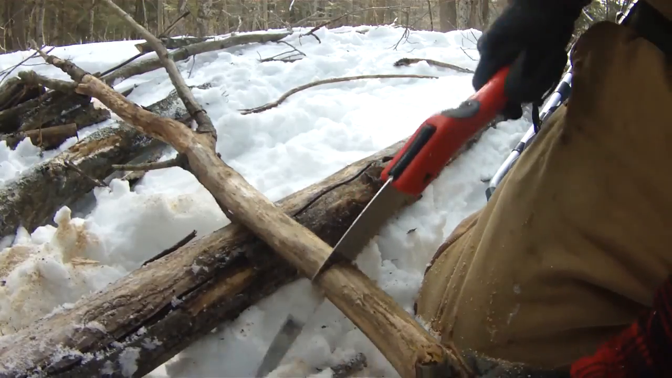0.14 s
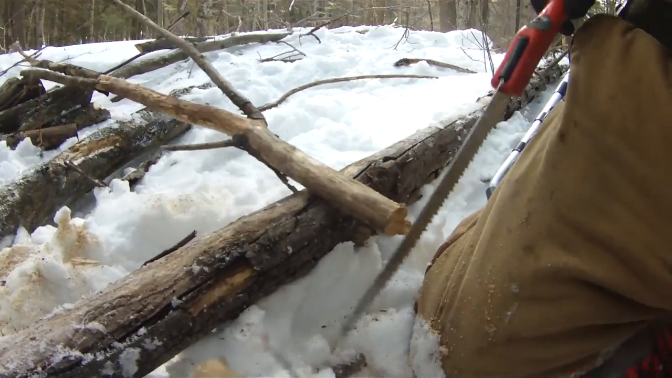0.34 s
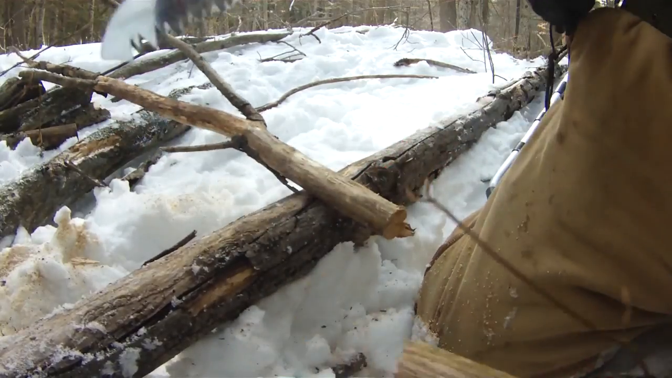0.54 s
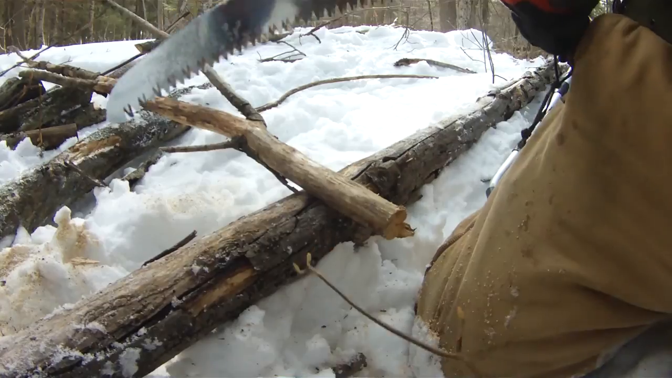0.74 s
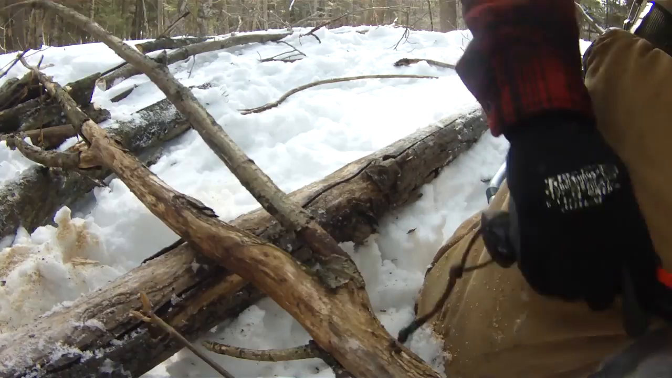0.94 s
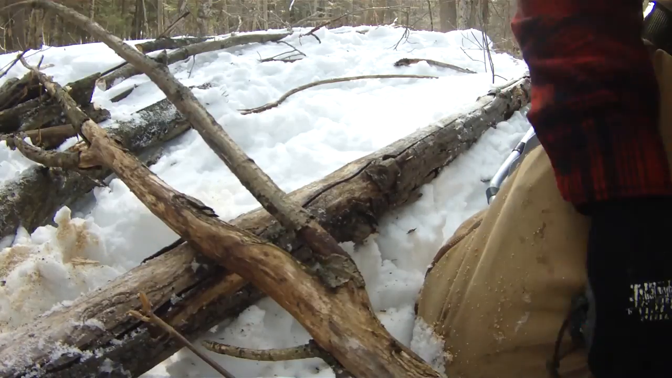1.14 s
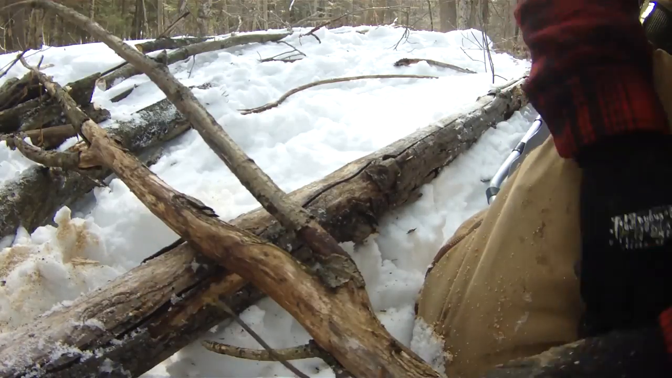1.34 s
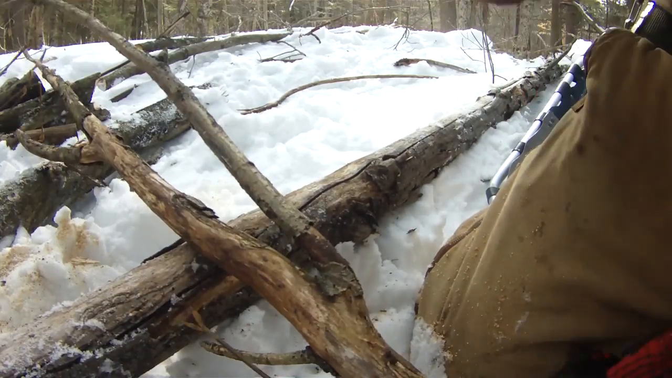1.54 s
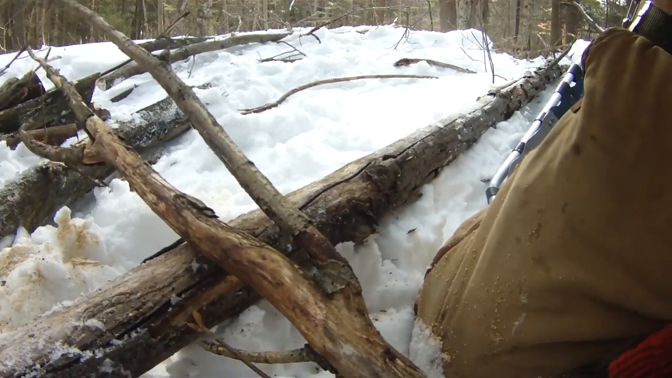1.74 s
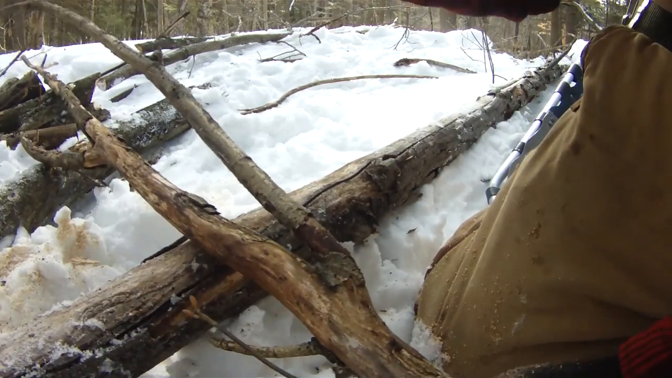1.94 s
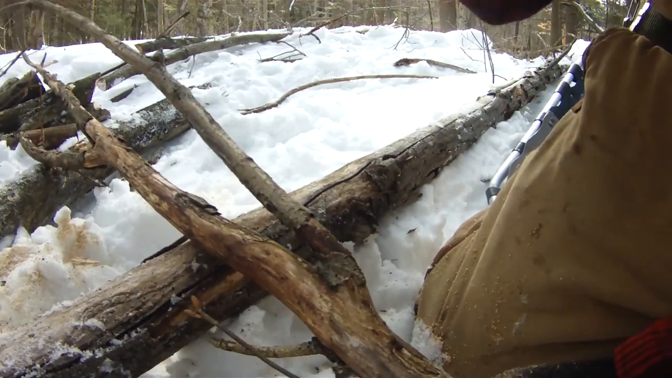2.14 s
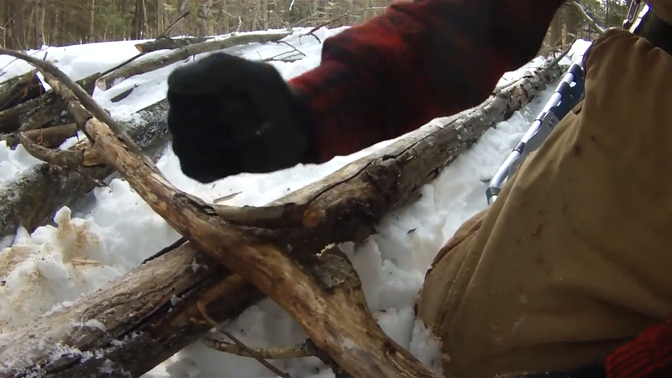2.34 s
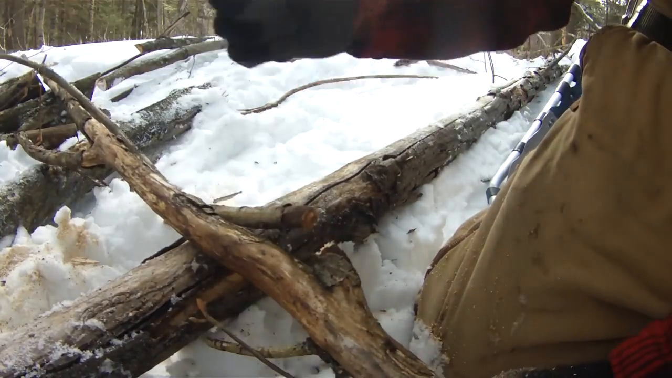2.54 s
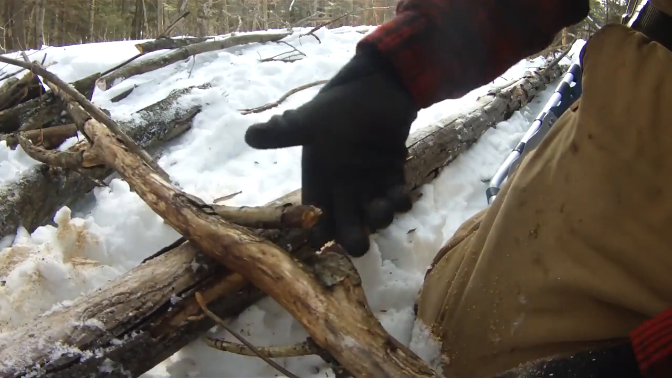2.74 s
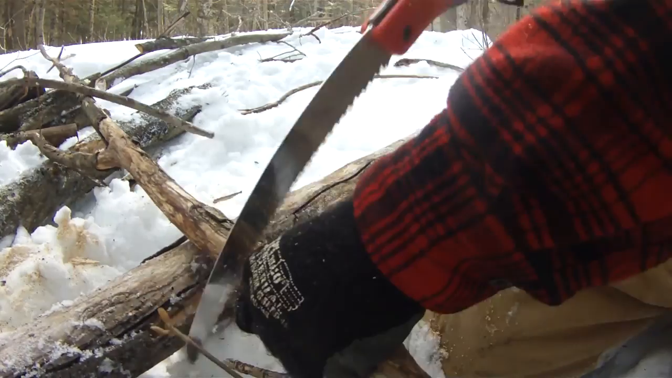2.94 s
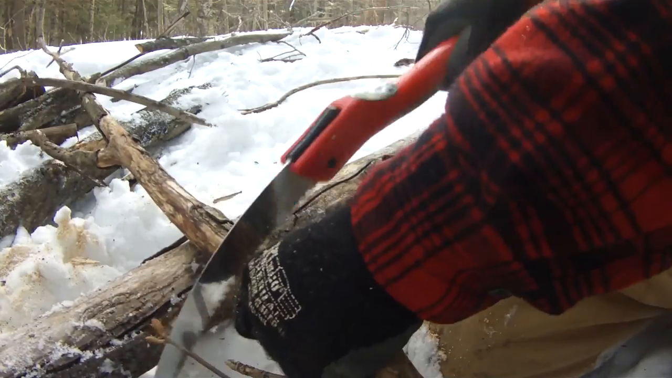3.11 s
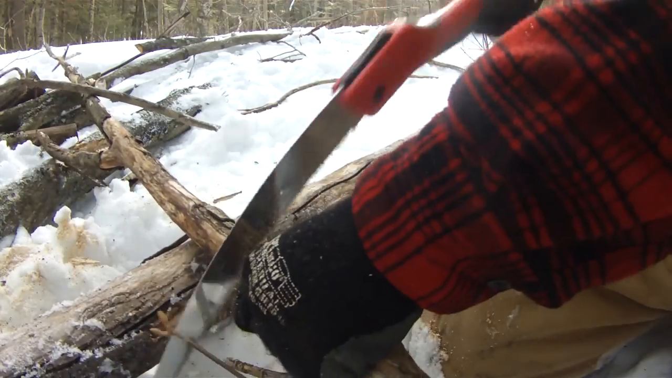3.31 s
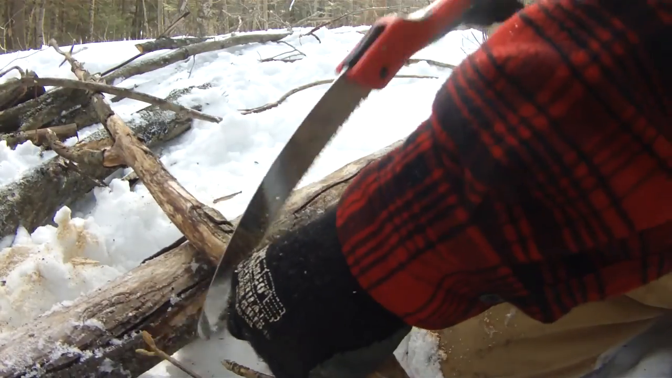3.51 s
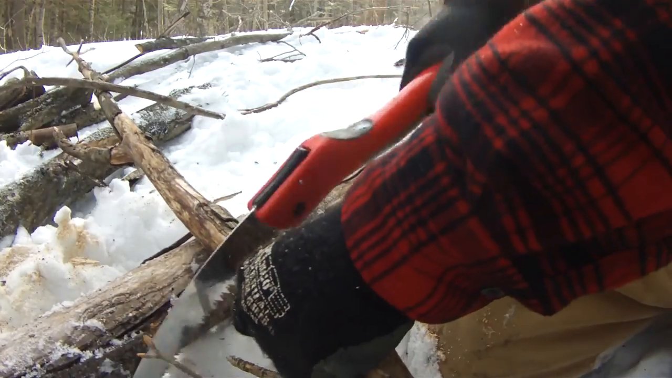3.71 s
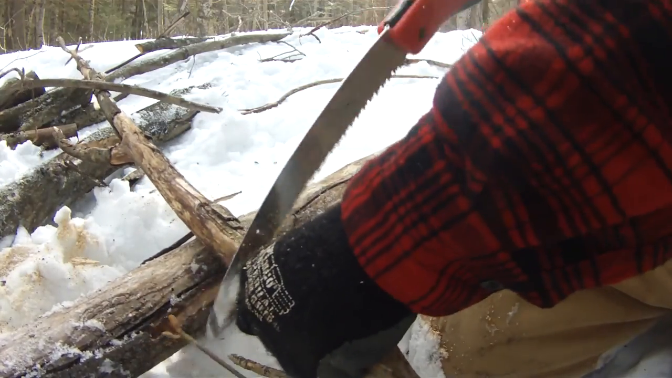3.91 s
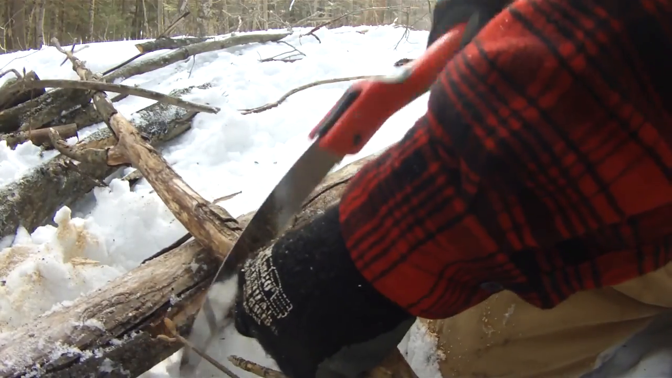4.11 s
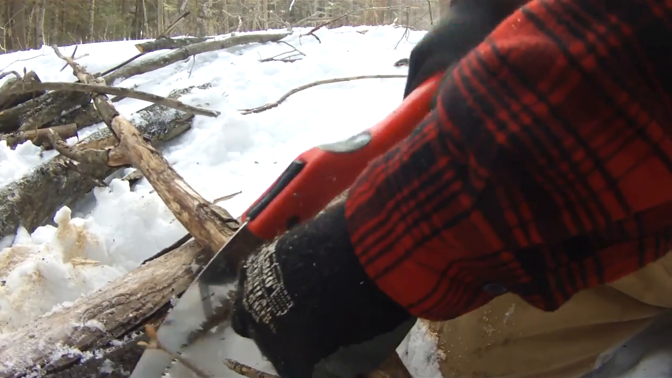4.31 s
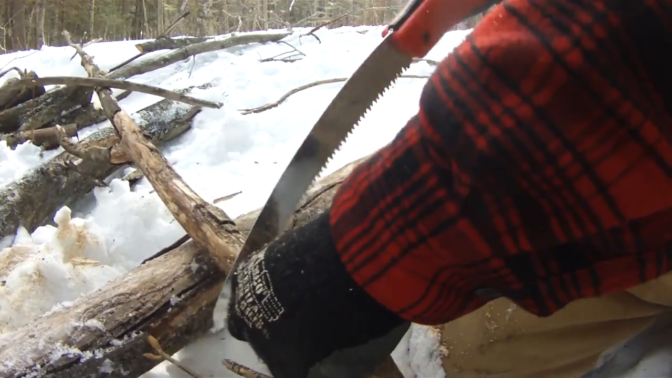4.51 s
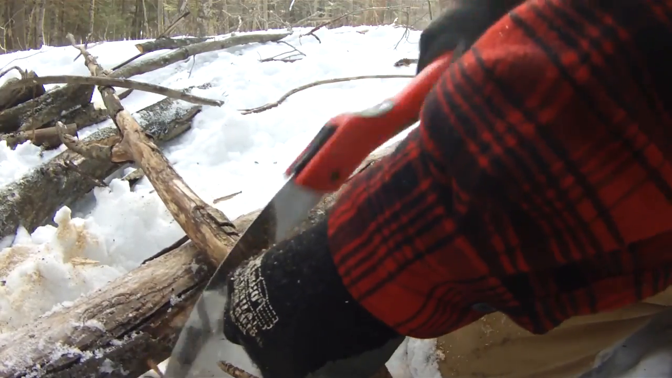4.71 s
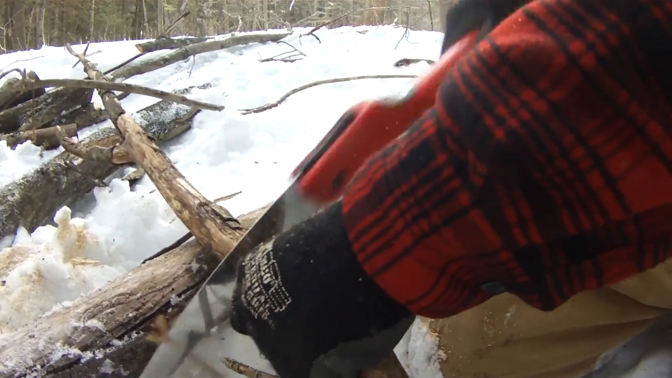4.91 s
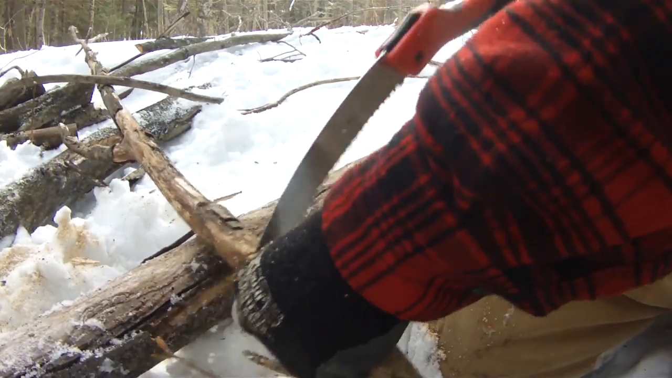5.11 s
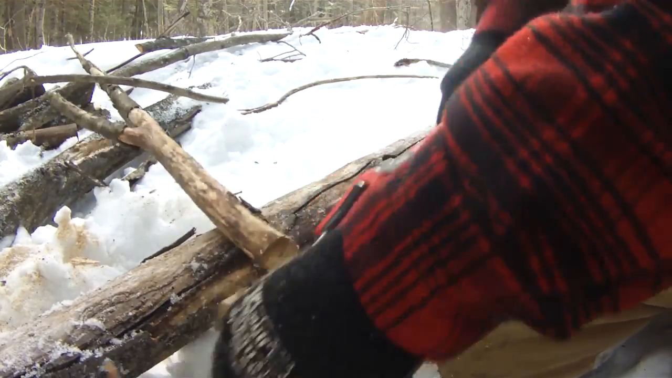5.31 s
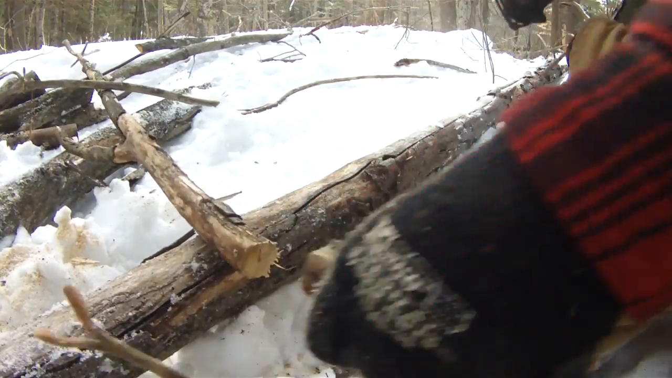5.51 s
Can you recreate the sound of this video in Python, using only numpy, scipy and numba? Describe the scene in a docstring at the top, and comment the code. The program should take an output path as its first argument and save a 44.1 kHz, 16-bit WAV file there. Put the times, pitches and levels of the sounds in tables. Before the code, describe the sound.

Close, dry sawing and sharp wood snaps in a hushed snowy wood, with knocks, a hollow clack and rapid back-and-forth strokes until a piece falls.

```python
"""A folding hand saw cuts through dead branches in a snowy wood: teeth pluck wood resonances, tear fibres and make
the blade sing. The first branch snaps and drops; the saw is laid down with clinks of damped modes, gloves shift the
branches and break off a twig, then quick pulls and pushes end as the second piece snaps and falls. Rubbing and
crunching are filtered noise and grains, cracks are noise bursts with a high note, knocks are damped stick modes.
The snow leaves almost no echo, only a faint dull scatter of the hits, over the hiss of still air."""
import sys
import numpy as np
from scipy import signal
from scipy.fft import rfft, irfft, next_fast_len
from scipy.io import wavfile
from scipy.ndimage import uniform_filter1d, map_coordinates
from numba import njit

SR = 44100
rng = np.random.default_rng(int(sys.argv[2]) if len(sys.argv) > 2 else 0)


def master(y):
    """Save y as 16-bit WAV."""
    cut = np.clip(np.atleast_2d(y).T, -1, 1)
    pcm = np.round(cut * 32767)  # scale
    wavfile.write(sys.argv[1], SR, pcm.astype(np.int16))


N = 244975


def amp(db):
    """Gain of a level in dB."""
    return 10 ** (np.asarray(db) / 20)


def unit(x):
    """x scaled to an RMS of 1."""
    return x / np.sqrt(np.mean(x ** 2) + 1e-20)


def filtered(x, response):
    """x filtered by a response, a function of frequency in Hz."""
    m = next_fast_len(N + 8192)  # zero-padded so that tails do not wrap round
    return irfft(rfft(x, m) * response(np.fft.rfftfreq(m, 1 / SR)), m)[:N]


def colour(points):
    """Gain interpolated between (freq_hz, level_db) points on a log frequency axis."""
    points_hz, points_db = np.transpose(points)
    return lambda hz: amp(np.interp(np.log(hz + 1), np.log(points_hz), points_db))


def resonant(modes):
    """Causal response of (freq_hz, width_hz, level_db) resonances with alternating signs."""
    def response(f):
        return sum((-1) ** k * amp(db) * 1j * f * width / (hz * hz - f * f + 1j * f * width)
                   for k, (hz, width, db) in enumerate(modes))
    return response


def causal(gain):
    """Minimum-phase response of the same gain: nothing sounds before the hit."""
    def response(hz):
        cepstrum = irfft(np.log(gain(hz) + 1e-6))
        cepstrum[1:len(hz) - 1] *= 2
        cepstrum[len(hz):] = 0
        return np.exp(rfft(cepstrum))
    return response


@njit
def sweep(x, hz, width_hz, sr):
    """A two-pole resonance whose centre moves."""
    y, r = np.zeros(len(x)), np.exp(-np.pi * width_hz / sr)
    for i in range(2, len(x)):
        y[i] = x[i] - x[i - 2] + 2 * r * np.cos(2 * np.pi * hz[i] / sr) * y[i - 1] - r * r * y[i - 2]
    return y


def wobble(rate_hz):
    """A smooth random curve through rate_hz knots a second."""
    knots = rng.standard_normal(int(N * rate_hz / SR) + 4)
    return map_coordinates(knots, [np.arange(N) * rate_hz / SR])


def grit(rate_hz, spread_db):
    """Random clicks of either sign, rate_hz a second, their levels spread exponentially in dB."""
    clicks = (rng.random(N) < rate_hz / SR) * rng.choice([-1, 1], size=N)
    return clicks * amp(spread_db * np.minimum(rng.exponential(size=N), 3.5))


def patchy(x, depth_db):
    """Random gain patches over time and frequency, as contact points and small resonances come and go."""
    z = signal.stft(x, nperseg=256)[2]
    field = uniform_filter1d(rng.standard_normal(z.shape), size=2, axis=0)
    field = uniform_filter1d(field, size=6, axis=1)
    return signal.istft(z * amp(depth_db * unit(field)), nperseg=256)[1][:N]


def held(starts_s, values):
    """The value of the latest event, per sample."""
    latest = np.searchsorted(starts_s, np.arange(N) / SR, side="right") - 1
    return np.asarray(values)[np.maximum(latest, 0)]


def arcs(rows, low_grows, high_grows):
    """Half-sine arm speed gives low and high gain, speed, progress -1 to 1; then any further columns, held."""
    creep = 0.06  # share of full speed left at the turns
    t = np.arange(N) / SR
    low, high, speed, progress = np.zeros((4, N))
    for start_s, length_s, share, low_db, high_db, *_ in rows:
        peak_s = start_s + np.clip(share, 0.05, 0.95) * length_s
        turn = np.interp(t, [start_s, peak_s, start_s + length_s], [0, 0.5, 1])
        on = (turn > 0) & (turn < 1)
        v = on * (creep + (1 - creep) * np.sin(np.pi * turn))
        low += amp(low_db) * v ** low_grows
        high += amp(high_db) * v ** high_grows
        speed = np.maximum(speed, v)
        progress = np.where(on, 2 * turn - 1, progress)
    columns = np.transpose(rows)
    return low, high, speed, progress, *[held(columns[0], c) for c in columns[5:]]


def saw():
    """Pulls and pushes load the branch differently and bend the blade's notes in opposite ways."""
    # pull strokes: start_s, length_s, share of length before full speed, wood_db, rasp_db
    pull_rows = [(3.148, 0.16, 0.47, -24, -31), (3.467, 0.17, 0.32, -24, -31.5),
                 (3.786, 0.17, 0.38, -24.5, -30), (4.112, 0.15, 0.49, -24.5, -29.5),
                 (4.4, 0.2, 0.34, -24.5, -30), (4.721, .17, 0.54, -25, -32.5), (5.04, 0.16, 0.51, -25, -30)]
    # push strokes: start_s, length_s, share before full speed, wood_db, rasp_db, main_hz, teeth_hz at full speed
    push_rows = [(2.975, 0.19, .55, -35.5, -44, 970, 400), (3.31, 0.16, 0.54, -25, -33.5, 1030, 410),
                 (3.638, 0.15, 0.55, -25, -33, 970, 420), (3.958, 0.16, 0.49, -26, -32, 1030, 420),
                 (4.266, 0.14, 0.49, -24.5, -32, 1070, 520), (4.57, .152, .5, -23.5, -32.5, 1060, 530),
                 (4.892, 0.15, 0.48, -24.5, -32.5, 950, 510), (5.225, 0.13, 0.4, -25, -30.5, 940, 410)]
    # last strokes through the first branch, which groans as it bends: columns as for the pushes
    first_rows = [(-.03, 0.14, 0.54, -30.5, -42.5, 880, 281), (.075, .09, 0.34, -23.5, -34.5, 662, 311.3),
                  (.15, 0.078, .6, -21, -38.5, 549, 367.6), (.21, .11, 0.23, -25, -37.5, 820, 288.2)]
    # further wood modes under pull, push and in the first branch: freq_hz, width_hz, level_db
    pull_modes = [(298, 58, -3), (529, 14.5, 17), (1300, 190, -3), (1910, 88, -31), (1820, 40, -1),
                  (2860, 260, -17)]
    push_modes = [(203, 62, -3), (462, 240, 3), (1370, 33, 1.5), (2037, 53, 0), (2165, 82, -6),
                  (2510, 220, -5)]
    first_modes = [(193.3, 43, -0.5), (335, 120, -1.5), (870, 150, -12.5), (1524, 140, -2),
                   (3570, 600, -20)]

    low, high, _, progress = arcs(pull_rows, low_grows=1.02, high_grows=1.42)
    main_hz = 900 * amp(0.029 * wobble(20))
    teeth_hz = 306.4 * amp(0.2 * wobble(18))
    pulls = strokes((low, high, progress, main_hz, teeth_hz), pull_modes, main_db=-1.0, main_width_hz=50,
                    grind_db=6.5, jitter=0.19, noise=0.85, glide=-0.041)
    pushes = strokes(sawing(push_rows), push_modes, main_db=-4.0, main_width_hz=210,
                     grind_db=-1.0, jitter=0.16, noise=1.0, glide=0.048)
    first = strokes(sawing(first_rows), first_modes, main_db=3.0, main_width_hz=75,
                    grind_db=-3.0, jitter=0.3, noise=1.0, glide=0.034)
    return pulls + pushes + first


def sawing(rows):
    """Controls of strokes: teeth pass faster mid-stroke, the main resonance sags as the stroke goes on."""
    main_sag, teeth_slow = 0.047, 0.23  # sag either side of mid-stroke; tooth rate lost towards zero speed
    low, high, speed, progress, main_hz, teeth_hz = arcs(rows, low_grows=1.287, high_grows=1.76)
    return low, high, progress, main_hz * (1 - main_sag * progress), teeth_hz * (1 - teeth_slow * (1 - speed))


def strokes(controls, wood, main_db, main_width_hz, grind_db, jitter, noise, glide):
    """Each tooth plucks the branch and tears fibres; the blade's notes glide as its free length changes."""
    # broad shaking of branch and blade: freq_hz, level_db
    grind_points = [(24, -90), (40, -36), (125, -8), (250, -10), (291, -2), (714, -5.5), (927, 0),
                    (1570, -8), (3070, -27), (3500, -7.5), (4550, -44.5), (7700, -120)]
    # fibres tearing: freq_hz, level_db
    rasp_points = [(1180, -13.5), (2000, -2), (3090, -5.5), (4300, -4.5), (4820, -8.5), (5210, -6),
                   (7980, -3), (12000, -22), (14700, -26.5), (15600, -30), (16000, -61)]
    # steel singing in the cut, mid-stroke: freq_hz, width_hz, level_db
    blade_modes = [(1860, 370, 5.5), (2814, 64, -2), (4813, 62, 4.5), (5510, 80, -3), (7660, 170, -7.5),
                   (8230, 98, -10)]

    low, high, progress, main_hz, teeth_hz = controls
    count = np.cumsum(teeth_hz) / SR + jitter * wobble(150)
    bites = (np.diff(np.floor(count), prepend=0) > 0) * amp(3.5 * rng.standard_normal(N))
    force = patchy(unit(bites) + noise * rng.standard_normal(N), depth_db=3.0)

    main = amp(main_db) * unit(sweep(force, main_hz, main_width_hz, SR))
    further = unit(filtered(force, resonant(wood)))
    grind = amp(grind_db) * unit(filtered(force, colour(grind_points)))
    body = filtered(main + further + grind, lambda hz: 1 / (1 + (hz / 3500) ** 4))

    # the tearing swells once per tooth
    fibres = rng.standard_normal(N) * (1 + 0.14 * np.cos(2 * np.pi * count))
    tearing = patchy(fibres + 0.25 * unit(grit(2700, spread_db=-1.5)), depth_db=3.0)
    steel = np.zeros(N)
    for hz, width_hz, db in blade_modes:
        note = unit(sweep(tearing, hz * (1 + glide * progress), width_hz, SR))
        steel += amp(db + 4.5 * wobble(25)) * note
    rasp = filtered(unit(tearing) + amp(-9) * unit(steel), colour(rasp_points))
    return low * amp(0.44 * wobble(45)) * unit(body) + high * amp(0.42 * wobble(60)) * unit(rasp)


def snaps():
    """Dry wood cracks: bursts of splintering with a brief high note."""
    # dry fibres and twigs cracking: start_s, level_db, pitch_hz
    crack_rows = [(0.2169, -2.5, 7600), (0.2354, -26.5, 3300), (0.5322, -35, 3100), (0.6958, -23, 3730),
                  (0.7074, -21, 5200), (0.7277, -25.5, 3130), (0.7921, -31.5, 3050), (0.8131, -27, 6960),
                  (0.85, -16, 2890), (0.9148, -47.5, 6240), (0.9448, -49, 3410), (1.0544, -53, 2780),
                  (1.2644, -54, 4950), (1.2845, -50, 2860), (1.4386, -47.5, 7550), (1.4464, -44, 3880),
                  (1.4701, -44, 4900), (1.5114, -50, 7000), (1.5384, -42.5, 2690), (1.5638, -54, 2480),
                  (1.7125, -47, 2860), (1.7799, -50, 3370), (2.0622, -52.5, 3800), (2.3216, 0.5, 6870),
                  (2.3242, -8, 3890), (2.3295, -13.5, 2850), (2.3404, -29, 2510), (2.3504, -30.5, 2500),
                  (2.3994, -43, 5370), (2.4194, -31.5, 5000), (2.4284, -38, 5040), (2.4448, -45.5, 4980),
                  (2.8469, -52, 4330), (2.8864, -56, 2650), (5.1904, -32, 7140), (5.228, -9, 3640),
                  (5.2344, -18, 6600), (5.3078, -16, 7900), (5.4251, -38, 3430), (5.5338, -47, 5780)]
    # the crack of dry wood: freq_hz, level_db
    crack_points = [(710, -36), (1200, 6.5), (1560, -1.5), (2170, -3.5), (2730, -2), (4920, -2), (7800, -1),
                    (15200, -31), (16400, -47.5)]
    dull_db = -32  # fainter cracks lose treble
    dull_t60_s, rise_s = 0.012, 0.00034  # t60 at dull_db; louder cracks die faster

    bursts, notes, t = np.zeros(N + SR), np.zeros(N + SR), np.arange(SR // 10) / SR
    for start_s, db, hz in crack_rows:
        t60_s = dull_t60_s * amp(-0.072 * (db - dull_db))
        fade = amp(db - 60 * t / t60_s) * (1 - np.exp(-t / rise_s))
        splinters = unit(uniform_filter1d(rng.standard_normal(len(t)), size=3 if db < dull_db else 1))
        i = round(start_s * SR)
        bursts[i:][:len(t)] += fade * splinters
        notes[i:][:len(t)] += 0.7 * fade * np.sin(2 * np.pi * hz * t)
    crack = colour(crack_points)
    level = np.sqrt(np.mean(crack(np.linspace(0, SR / 2, num=500)) ** 2))
    return notes[:N] + filtered(bursts[:N], causal(crack)) / level


def ring(modes, t):
    """Damped (freq_hz, level_db, t60_s) modes, each at a new strength."""
    return sum(amp(db + rng.normal(0, 0.67) - 60 * t / t60_s) * np.sin(2 * np.pi * hz * t)
               for hz, db, t60_s in modes)


def knocks():
    """The short ring of a stick, pitched by its length, roughened by bark and over a dull puff."""
    # sticks knocking on the log and on each other: start_s, level_db, pitch_hz
    stick_rows = [(0.085, -22.5, 880), (0.221, -15, 1330), (0.236, -21.5, 980), (0.504, -32, 650),
                  (0.727, -30, 662), (0.795, -18, 380), (0.848, -27, 790), (0.852, -10, 860),
                  (1.156, -52.5, 463), (1.286, -49, 409), (1.41, -46, 1204), (1.563, -41, 657),
                  (1.666, -42, 1330), (1.712, -33.5, 1310), (1.769, -43, 1324), (1.847, -45, 870),
                  (1.907, -51, 918), (1.989, -45.5, 1126), (2.057, -51, 1170), (2.134, -45, 900),
                  (2.253, -51.5, 1000), (2.316, -31.5, 1200), (2.322, -15, 633), (2.3291, -7.5, 980),
                  (2.351, -29.5, 480), (2.586, -60.5, 1450), (2.721, -59, 1450), (5.226, -25, 1110),
                  (5.344, -17.5, 550), (5.35, -23, 346), (5.388, -19.5, 840), (5.393, -18.5, 484),
                  (5.427, -36, 1210), (5.491, -23.5, 804), (5.496, -22, 380)]
    # teeth catch and knock the branch as a stroke sets in: start_s, level_db
    catch_rows = [(3.156, -32), (3.317, -39), (3.356, -16), (3.486, -33), (3.661, -35.5), (3.803, -31.5),
                  (4.105, -29), (4.128, -25.5), (4.408, -26.5), (4.729, -32), (4.914, -21), (5.047, -34.5)]
    # a stick's modes: multiple of pitch, level_db, share of t60
    stick_modes = [(1, 7.5, 1), (2.3, -16, 0.27), (.55, -6, 0.54), (1.5, -7, 0.25)]
    catch_hz = 980

    out, t = np.zeros(N + SR), np.arange(SR // 5) / SR
    for start_s, db, pitch_hz in [*stick_rows, *[(s, level_db, catch_hz) for s, level_db in catch_rows]]:
        t60_s = 0.023 * amp(-0.18 * (db + 26.5))  # harder knocks die faster
        modes = [(pitch_hz * k, mode_db, t60_s * share) for k, mode_db, share in stick_modes]
        bark = unit(uniform_filter1d(rng.standard_normal(len(t)), size=40))
        dull = uniform_filter1d(uniform_filter1d(rng.standard_normal(len(t)), size=10), size=10)
        puff = amp(-14.0 - 60 * t / t60_s) * unit(dull)
        knock = (ring(modes, t) * (1 + 0.35 * bark) + puff) * (1 - np.exp(-t / 0.0006))
        out[round(start_s * SR):][:len(t)] += amp(db) * knock
    return out[:N]


def clinks():
    """The hollow handle clacks low and briefly, the steel blade rings high and longer."""
    # the saw set against wood: start_s, level_db, steel_db relative to the handle
    clink_rows = [(1.2408, -18, -29.5), (1.3241, -35.5, -32), (1.3314, -39, -36), (1.3434, -41, -36),
                  (1.5998, -47, -29), (1.6524, -38, -17), (1.6882, -54, -25), (2.9218, -40, -27)]
    # modes of handle and blade: freq_hz, level_db, t60_s
    handle_modes = [(1207, 11, 0.028), (1080, -2, 0.022), (1370, -23, 0.038), (2410, 5, 0.015),
                    (510, -12, 0.056), (299, -20, 0.17)]
    steel_modes = [(4807, -3, .2), (5566, -4, .13), (6300, -8, .05), (3400, 0, .02), (8200, -3, .02)]

    out, t = np.zeros(N + SR), np.arange(SR // 2) / SR
    for start_s, db, steel_db in clink_rows:
        clack = amp(-13.5 - 60 * t / 0.037) * uniform_filter1d(rng.standard_normal(len(t)), size=5)
        handle = ring(handle_modes, t) * (1 - np.exp(-t / 0.0048))
        steel = amp(steel_db) * ring(steel_modes, t)
        out[round(start_s * SR):][:len(t)] += amp(db) * (handle + clack + steel)
    return out[:N]


def rustle():
    """Friction of dragged branches, settling wood and snow, and the shaking twig."""
    # branches dragged over bark and snow: start_s, length_s, share before full speed, rub_db, crunch_db, note_hz
    drag_rows = [(.265, 0.25, 0.47, -28.5, -48, 700), (.49, 0.12, 0.35, -28, -44, 654),
                 (.605, 0.12, 0.69, -25, -36, 770), (.77, 0.092, 0.8, -34.5, -48, 440),
                 (1.08, .12, 0.4, -69.5, -69.5, 480), (1.35, 0.5, 0.18, -55.5, -68, 930),
                 (1.76, 0.28, .5, -53, -69.5, 793), (2.03, 0.047, 0.43, -63, -75, 1000),
                 (5.17, 0.074, .4, -39, -43.5, 900), (5.315, .075, 0.58, -28.5, -37, 498),
                 (5.43, 0.095, .5, -56, -54.5, 680)]
    # loose wood and snow settling after a blow: start_s, rub_db, crunch_db, rub_t60_s, note_hz
    settle_rows = [(.726, -26.5, -38.5, 0.34, 594), (.862, -38.5, -58, .25, 700),
                   (1.25, -42.5, -60, 0.36, 1150), (1.655, -39.5, -59, 0.483, 1060),
                   (2.136, -54, -77.5, .2, 861), (2.924, -37, -44.5, 0.1, 550),
                   (5.388, -28.5, -43, 0.18, 700), (5.493, -31.5, -49, 0.16, 495)]
    # the broken twig shakes and sheds bark: columns as for the settling
    twig_rows = [(2.334, -18.5, -36, 0.12, 739), (2.421, -43, -44.5, 0.17, 1010)]
    # spectra of rub and crunch, of branches and of the twig: freq_hz, level_db
    rub_points = [(24, -67), (40, -24.5), (172, 1.5), (291, 0), (650, 4.5), (741, -5), (945, 3),
                  (2320, -16), (3500, -30), (4550, -41), (7700, -120)]
    crunch_points = [(1180, -30), (2000, -4.5), (3370, 0.5), (3650, -2.5), (4300, -4), (6040, 2),
                     (7510, 0.5), (14700, -33), (16000, -49.5)]
    twig_rub_points = [(35, -50.5), (60, -23), (340, -5.5), (470, 2), (824, -8), (1470, -12), (3500, -31),
                       (4550, -54), (7700, -120)]
    twig_crunch_points = [(1180, -44.5), (2000, -14.5), (3310, -7), (3770, -14), (5160, 4), (10800, -33),
                          (16000, -62)]

    low, high, _, _, note_hz = arcs(drag_rows, low_grows=1, high_grows=1.26)
    drags = shuffle((low, high, note_hz), rub_points, crunch_points, grain=0.71)
    settling = shuffle(fades(settle_rows), rub_points, crunch_points, grain=1.0)
    twig = shuffle(fades(twig_rows), twig_rub_points, twig_crunch_points, grain=1.9)
    return drags + settling + twig


def fades(rows):
    """A quick rise and an even dying away: low and high gain, note_hz."""
    rise_s, crunch_fades = 0.0028, 1.1  # the crunch dies that many times faster
    low, high = np.zeros((2, N))
    for start_s, low_db, high_db, t60_s, _ in rows:
        age_s = np.maximum(np.arange(N) / SR - start_s, 0)
        rise = 1 - np.exp(-age_s / rise_s)
        low += rise * amp(low_db - 60 * age_s / t60_s)
        high += rise * amp(high_db - 60 * crunch_fades * age_s / t60_s)
    columns = np.transpose(rows)
    return low, high, held(columns[0], columns[-1])


def shuffle(controls, rub_colour, crunch_colour, grain):
    """Bark slips in clumps: a low rub with a wandering note and a crunch of small grains that share the slips."""
    low, high, note_hz = controls
    note_hz = note_hz * amp(wobble(15))
    slips = wobble(55)
    force = rng.standard_normal(N) + 0.27 * unit(grit(520, spread_db=4.5))
    rub = unit(filtered(patchy(force, depth_db=-1.5), colour(rub_colour)))
    rub += amp(-13.5) * unit(sweep(force, note_hz, 120.0, SR))
    grains = rng.standard_normal(N) + grain * unit(grit(700, spread_db=8.5))
    crunch = filtered(patchy(grains, depth_db=2.5), colour(crunch_colour))
    crunch *= amp(0.82 * slips + 1.9 * wobble(90))
    return low * unit(amp(2.5 * slips) * rub) + high * unit(crunch)


def snowfield(x):
    """A short dull scatter from logs and trunks nearby: x convolved with decaying noise."""
    t = np.arange(SR // 4) / SR
    tail = rng.standard_normal(len(t)) * amp(-60 * t / 0.1) * (t > 0.002)
    wet = signal.fftconvolve(x, tail / np.linalg.norm(tail))[:N]
    return filtered(wet, lambda hz: 1 / (1 + (hz / 4000) ** 2))


def air():
    """Steady faint noise that breathes a little."""
    # still winter air and microphone hiss: freq_hz, level_db
    air_points = [(15, -38), (25, 5.5), (55, -5), (200, -1.5), (451, -1), (714, 2), (1610, -4.5),
                  (2110, -12), (3080, -18), (5280, -19), (5730, -20.5), (13200, -22.5), (16000, -42.5)]
    hiss = unit(filtered(rng.standard_normal(N), colour(air_points)))
    return amp(-67 + 1.7 * wobble(4.1)) * hiss


def scene():
    """Saw, rustle, hits with their scatter, and air, as one channel."""
    hits = snaps() + knocks() + clinks()
    return (saw() + rustle() + hits + amp(-14) * snowfield(hits) + air())[None]


def record(dry):
    """Peaks saturate softly towards full scale; deep bass and everything above the band limit are removed."""
    clipped = dry[0] / (1 + np.abs(dry[0]) ** 8) ** (1 / 8)
    thin = filtered(clipped, lambda hz: (1j * hz / (1j * hz + 60)) ** 3)
    return filtered(thin, lambda hz: hz < 16300)[None]


dry = scene()
out = record(dry)
master(out)
```